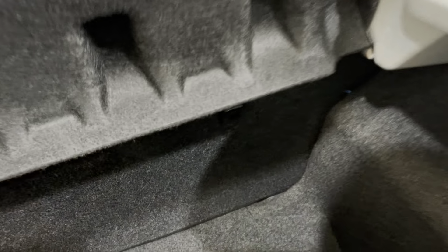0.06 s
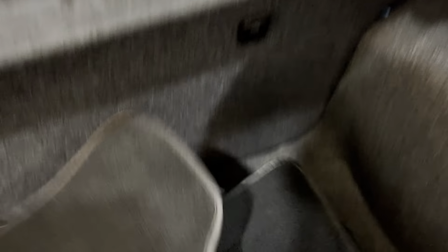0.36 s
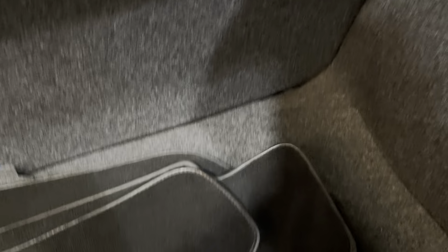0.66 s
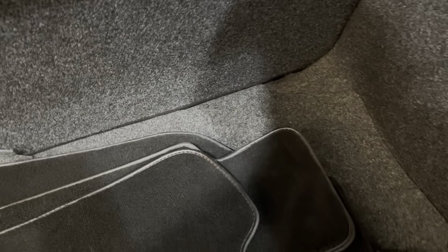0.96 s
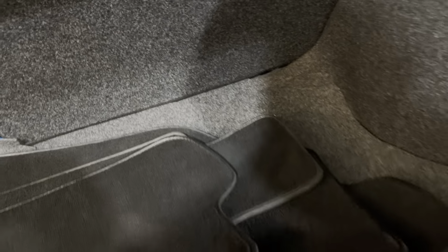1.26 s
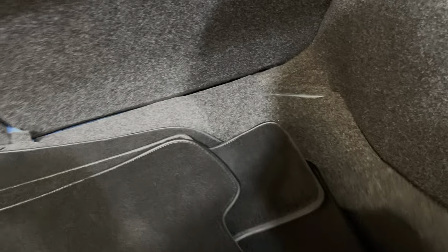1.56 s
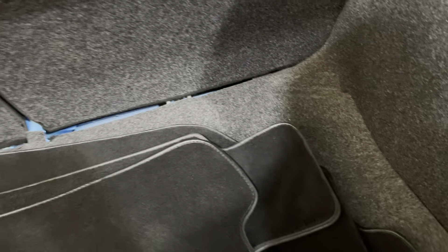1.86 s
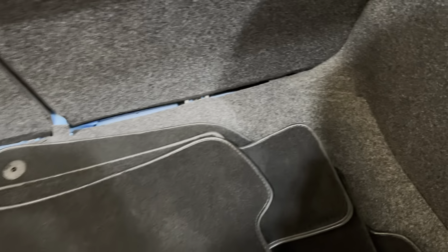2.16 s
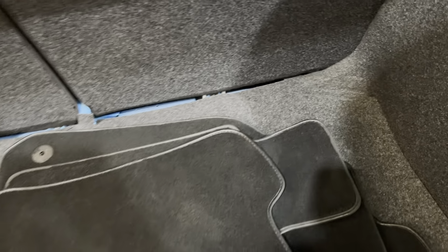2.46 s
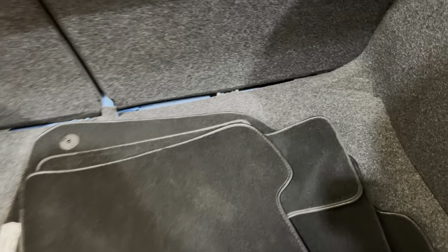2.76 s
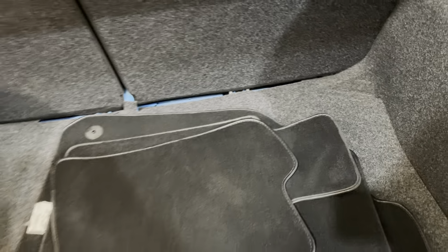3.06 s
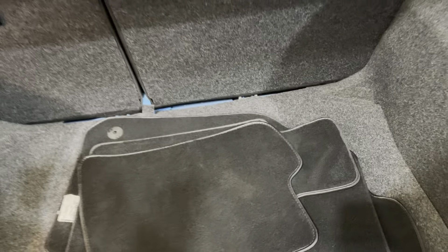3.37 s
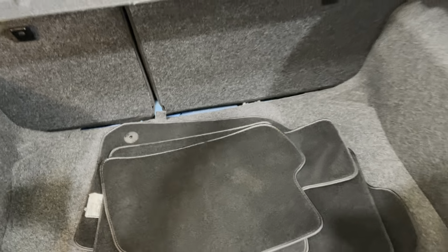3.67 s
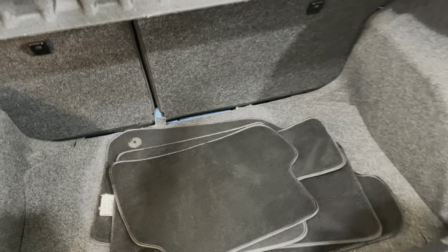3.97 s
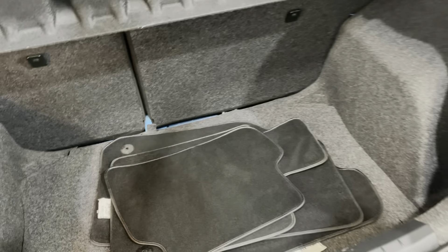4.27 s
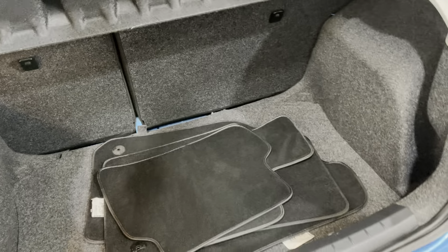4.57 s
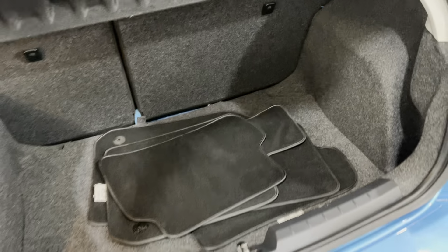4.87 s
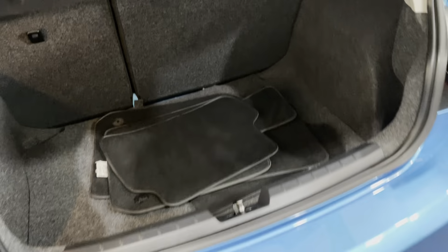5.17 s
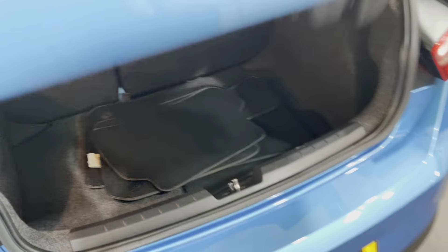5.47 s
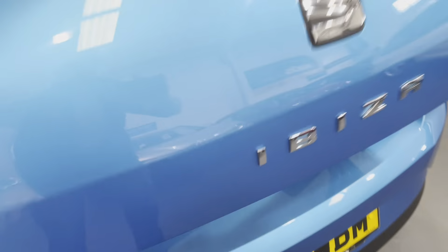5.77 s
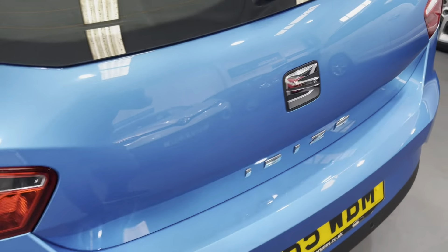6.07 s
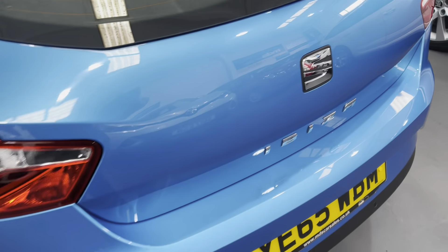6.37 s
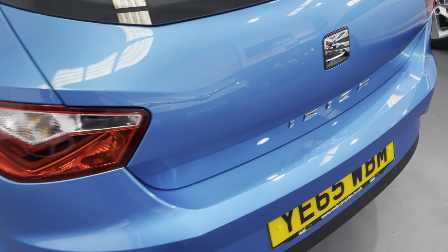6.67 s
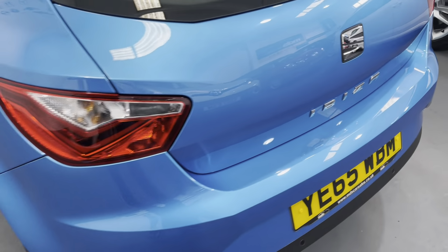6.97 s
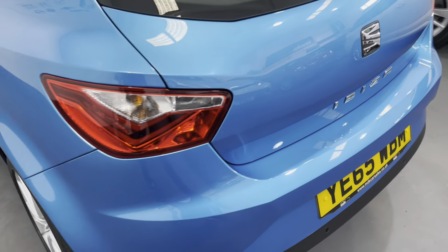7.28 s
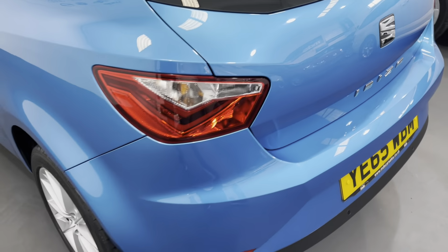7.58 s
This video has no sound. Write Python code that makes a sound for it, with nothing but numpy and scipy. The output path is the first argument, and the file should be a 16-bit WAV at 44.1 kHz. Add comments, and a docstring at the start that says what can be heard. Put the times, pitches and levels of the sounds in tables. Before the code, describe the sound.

A hand works at the carpeted shelf and plastic trim of a car boot, close to the microphone, making hollow knocks, low thumps, felt rubbing and short scrapes. A lull follows with faint sleeve swishes. The tailgate is pulled down with a soft thud and a slight hiss from its struts, then latches and slams loudly. The slam echoes through a large hall over quiet ventilation.

```python
"""At a car boot in a large ventilated hall, the carpeted shelf and trim are handled close by.
Knocks and soft pushes excite their modes; stick-slip friction makes felt hiss and plastic scrape.
Sleeves swish, the tailgate is pulled down on its gas struts, catches its latch and slams.
The hall reverberates, swelling as a limiter lets go."""
import sys
import numpy as np
from scipy import signal
from scipy.fft import rfft, irfft, next_fast_len
from scipy.io import wavfile
from scipy.ndimage import uniform_filter1d, minimum_filter1d

SR = 44100
rng = np.random.default_rng(int(sys.argv[2]) if len(sys.argv) > 2 else 0)


def generate_wav(sig):
    """Save sig (samples, or channels by samples) to the path in sys.argv[1] as 16-bit PCM at SR."""
    pcm = np.round(np.clip(np.atleast_2d(sig).T, -1, 1) * 32767).astype(np.int16)
    wavfile.write(sys.argv[1], SR, pcm)


N = 344579
TIME = np.arange(N) / SR


def amp(db):
    """Amplitude ratio of a level in decibels."""
    return 10 ** (np.asarray(db) / 20)


def unit(x):
    """Normalisation to rms 1."""
    return x / np.sqrt(np.mean(x ** 2) + 1e-20)


def read(points, hz, axis=1):
    """Interpolation of one table column over log frequency."""
    table = np.array(points, float)
    return np.interp(np.log(hz + 1), np.log(table[:, 0] + 1), table[:, axis])


def add(mix, s, sound):
    """Superposition: a sound joins the mix at time s."""
    part = mix[..., max(round(s * SR), 0):][..., :sound.shape[-1]]
    part += sound[..., :part.shape[-1]]


def tint(x, spectrum):
    """Zero-phase filtering by a curve of (frequency [Hz], gain [dB])."""
    size = next_fast_len(x.shape[-1])
    gain = amp(read(spectrum, np.fft.rfftfreq(size, 1 / SR)))
    return irfft(rfft(x, size) * gain, size)[..., :x.shape[-1]]


def octaves(x):
    """Filter bank of overlapping octaves, giving (centre [Hz], band) pairs."""
    size = next_fast_len(x.shape[-1])
    hz, spectrum = np.fft.rfftfreq(size, 1 / SR), rfft(x, size)
    centres = 50 * 2. ** np.arange(9)
    shares = [np.interp(np.log(hz + 1), np.log(centres), row) for row in np.eye(len(centres))]
    return [(c, irfft(spectrum * share, size)[..., :x.shape[-1]]) for c, share in zip(centres, shares)]


def lag(x, time_s):
    """First-order relaxation towards x with time constant time_s."""
    pole = np.exp(-1 / (time_s * SR))
    return signal.lfilter([1 - pole], [1, -pole], x)


def decay(t, t60):
    """Exponential damping: 60 dB lost every t60 seconds."""
    return np.exp(-np.log(1000) * t / t60)


def between(start, end, edge_s):
    """Trapezoidal gate from start to end."""
    return np.clip(np.minimum(TIME - start, end - TIME) / edge_s, 0, 1)


def swells(rows, depth_db, edge_s=0.0054):
    """Level follows speed: a movement gains depth_db up to its fastest moment, then loses it."""
    out = np.zeros(N)
    for start, fastest, end, db in rows:
        slowness = np.interp(TIME, [start, fastest, end], [1, 0, 1])
        out += amp(db - depth_db * slowness) * between(start, end, edge_s)
    return out


def strokes(rows, attack):
    """Envelopes of short strokes: a linear rise over the fraction attack, then a smooth fall."""
    out = np.zeros(N)
    for s, length, db in rows:
        done = np.linspace(0, 1, int(length * SR))
        add(out, s, amp(db) * np.minimum(done / attack, 1) * np.cos(np.pi / 2 * done ** 2) ** 2)
    return out


# the field at two microphone ports: (frequency [Hz], coherence [0-1], phase lead of the left [rad])
PORT_COHERENCE = [(60.1, 0.97, 0), (278, 0.85, 0), (585, 0.28, 0.5), (1200, 0.22, 0.66), (2860, 0.59, .5),
                  (7700, 0.87, 1), (8920, 0.6, -0.5), (10830, 1, -5.5), (11360, 0.5, -5.5),
                  (13000, 0.7, -2.5)]
def ports(x, spectrum):
    """Partial coherence: two independent signals become one coloured sound at two nearby points."""
    size = next_fast_len(x.shape[-1])
    hz = np.fft.rfftfreq(size, 1 / SR)
    left, independent = rfft(x, size)
    coherence = np.clip(read(PORT_COHERENCE, hz), 0, 1)
    phase = read(PORT_COHERENCE, hz, axis=2)
    right = (coherence * left + np.sqrt(1 - coherence ** 2) * independent) * np.exp(-1j * phase)
    return irfft(np.array([left, right]) * amp(read(spectrum, hz)), size)[:, :x.shape[-1]]


def noise(spectrum, size=N):
    """Coloured Gaussian noise at both ports."""
    return unit(ports(rng.standard_normal((2, size)), spectrum))


def friction(spectrum, slips_per_s, spread_db, clump_db):
    """Stick-slip friction: random impulses whose strength varies in clumps of a few milliseconds."""
    clumps = unit(tint(rng.standard_normal(N), [(40, 0), (150, -12), (500, -60)]))
    slips = rng.random(N) < slips_per_s / SR
    strength = amp(spread_db * np.minimum(rng.exponential(1, N), 4) + clump_db * clumps)
    return unit(ports(slips * strength * rng.standard_normal((2, N)), spectrum))


def blows(rows, modes, fine_spectrum, fine_decay, modes_db, rise_s, size=12000):
    """Modal impact response: a few main modes, plus dense fine ones as decaying bands of noise."""
    out = np.zeros((2, N))
    t, hz = np.arange(size) / SR, np.fft.rfftfreq(size, 1 / SR)
    for s, db, tilt_db, ring in rows:
        tilt = lambda f: amp(tilt_db * np.log2(np.maximum(f, 500) / 1000))  # harder is brighter
        burst = irfft(rfft(noise(fine_spectrum, size)) * tilt(hz), size)
        fine = sum(band * decay(t, read(fine_decay, f) * ring) for f, band in octaves(burst))
        main = np.zeros(size)
        for f, mode_db, t60 in modes:
            sign = rng.choice([-1, 1])  # set by the spot that is struck
            main += sign * amp(mode_db) * tilt(f) * np.sin(2 * np.pi * f * t) * decay(t, t60 * ring)
        add(out, s, amp(db) * (fine + amp(modes_db) * main) * (1 - np.exp(-t / rise_s)))
    return out


def flex(rows, rise_cycles, overtone, overtone_db, size=24000):
    """Damped free vibration: a fundamental and one weaker, faster-fading mode above it."""
    out, t = np.zeros(N), np.arange(size) / SR
    for s, db, hz, t60 in rows:
        fade = decay(t, t60)
        fundamental = fade * np.sin(2 * np.pi * hz * t)
        upper = amp(overtone_db) * fade ** 1.53 * np.sin(2 * np.pi * hz * overtone * t)
        onset = 1 - np.exp(-(t * hz / rise_cycles) ** 2)
        add(out, s, amp(db) * (fundamental + upper) * onset)
    return out


# air moving in the hall: (frequency [Hz], spectral density [dB])
VENT_SPECTRUM = [(15, -24), (25, -16.5), (59, -8.5), (144, -22), (178, -17.5), (360, -26), (520, -27),
                 (577, -25.5), (624, -28), (1230, -27), (1520, -33), (1730, -31.5), (2920, -42.5),
                 (3420, -45), (13000, -71), (16900, -85.5), (22000, -120)]
def ventilation(start_db=-53.5, rise_db_per_s=0.94, step_back_s=3.4):
    """Broadband flow noise, growing louder on stepping back from the boot."""
    return amp(start_db + rise_db_per_s * np.maximum(TIME - step_back_s, 0)) * noise(VENT_SPECTRUM)


# hard blows: (time [s], level [dB], treble tilt [dB/octave], t60 factor [1], rebound gain [dB])
SHELF_KNOCKS = [(.031, -51.5, 3, 0.83, -15), (.417, -31.5, -3, 1.56, 12), (.440, -10, -6.5, 0.74, 2.5),
                (.663, -31.5, 6, 0.42, 4.5), (.697, -32, -8, 2.74, -15), (.771, -34.5, -4, 0.5, -15),
                (.834, -47.5, 9.5, 0.73, -21.5), (0.915, -34, -0.5, 1.36, -19.5),
                (0.9322, -13, -1, .56, -27), (1.019, -41.5, 3.5, 0.81, -18), (1.061, -48.5, 8.5, 0.35, 1.5),
                (1.158, -32, 4, 0.92, -19), (1.702, -49, -4.5, .9, -13), (1.7681, -16, -5, 1.02, -27),
                (1.886, -35, -6.5, 2, -7), (1.995, -50, 6, 0.9, -3), (2.034, -49, 3.5, 1.5, -1),
                (2.0872, -37, 0.5, 0.66, -31), (4.483, -42, 3, 2, -1), (4.549, -47.5, -1.5, 6.3, -7)]
# main modes of the shelf: (frequency [Hz], level [dB], t60 [s])
SHELF_MODES = [(468, -11, 0.24), (533, 3.5, 0.067), (656, 4, .07), (708, 3.5, 0.085), (908, 6.5, 0.047),
               (910, -10, 0.057), (1420, -10, 0.036), (1456, -2, 0.057), (2004, -36, 0.056),
               (2600, -13.5, 0.034)]
# fine modes of the trim: (frequency [Hz], spectral density [dB]) and (frequency [Hz], t60 [s])
TRIM_SPECTRUM = [(35, -17.5), (100, 3.5), (150, 3.5), (370, -5.5), (520, -2.5), (700, -8.5), (1350, -4),
                 (2400, -11), (3500, -16), (5500, -20), (8500, -23.5), (12000, -26.5)]
TRIM_T60 = [(200, 0.16), (700, 0.062), (2000, 0.063), (10000, 0.04)]
def knocks(rebound_s=0.012):
    """Impact and rebound: each blow rings shelf and trim, and a loose part strikes once more."""
    first = [row[:4] for row in SHELF_KNOCKS]
    second = [(s + rebound_s, db + gain_db, tilt, ring) for s, db, tilt, ring, gain_db in SHELF_KNOCKS]
    return blows(first + second, SHELF_MODES, TRIM_SPECTRUM, TRIM_T60, modes_db=-15.5, rise_s=0.00027)


# hand over felt: (start [s], fastest [s], end [s], relative hiss level [dB], scrape level [dB])
HAND_RUBS = [(0.067, 0.105, 0.2, -46, -59.5), (0.17, 0.378, 0.407, -41.5, -55.5),
             (0.415, 0.421, 0.57, -38, -44), (0.657, 0.664, 0.86, -49, -44), (0.807, 0.831, 0.99, -36, -44),
             (0.936, 1.079, 1.097, -45.5, -48.5), (1.085, 1.158, 1.2, -36, -47),
             (1.345, 1.515, 1.54, -45, -53), (1.52, 1.598, 1.78, -48.5, -54.5),
             (1.682, 1.837, 1.933, -40.5, -40), (1.88, 1.918, 2.09, -49, -51)]
# fibre hiss, board scrape and board rumble: (frequency [Hz], spectral density [dB])
FELT_SPECTRUM = [(700, -37), (2000, -3), (4000, 0.5), (6500, 0.5), (9000, 2.5), (11400, 4), (12800, 5.5)]
BOARD_SPECTRUM = [(130, -7.5), (300, -10.5), (700, 3), (1100, -3.5), (2000, -7.5), (3200, -12.5),
                  (6000, -19), (12000, -34)]
RUMBLE_SPECTRUM = [(25, -49), (60, 7.5), (115, -6), (220, -8), (400, -23), (900, -54)]
def rubbing():
    """Sliding friction: felt fibres hiss, and their slips force the board into vibration."""
    creep = between(0.032, 2.11, edge_s=0.046)  # the hand stays on the shelf between strokes
    hiss = swells([(*times, db) for *times, db, _ in HAND_RUBS], depth_db=20.5) + amp(-66) * creep
    scrape = swells([(*times, db) for *times, _, db in HAND_RUBS], depth_db=20.5) + amp(-65.5) * creep
    fibres = amp(1.0) * hiss * friction(FELT_SPECTRUM, slips_per_s=11000, spread_db=0.0, clump_db=3)
    board = scrape * friction(BOARD_SPECTRUM, slips_per_s=3100, spread_db=0.5, clump_db=3.5)
    rumble = amp(-10.5) * lag(scrape ** 0.62 + 1e-12, time_s=0.015)  # 0.62 dB per dB of scrape
    return fibres + board + rumble * noise(RUMBLE_SPECTRUM)


# plastic dragging over plastic: (time [s], duration [s], level [dB])
PLASTIC_DRAGS = [(.071, 0.082, -32.5), (.83, 0.11, -42.5), (1.125, 0.069, -39), (1.43, 0.18, -42),
                 (1.815, 0.057, -44)]
# a single slip: (frequency [Hz], spectral density [dB])
SLIP_SPECTRUM = [(100, 7), (3000, -4), (4200, -4.5), (7000, -10.5), (9000, -4.5), (12000, 1)]
# resonances of the hollow trim: (frequency [Hz], bandwidth [Hz], level [dB])
HOLLOW_MODES = [(297, 35, 1), (465, 14, 0), (593, 190, -2.5), (705, 20, -1), (760, 7.6, -6), (980, 140, -2),
                (1490, 87, -4.5), (1780, 160, -6.5), (2270, 190, -6.5), (2640, 330, -12), (7900, 1100, -33)]
def scrapes():
    """Source and filter: dense stick-slip impulses drive the resonances of the hollow trim."""
    slips = friction(SLIP_SPECTRUM, slips_per_s=4200, spread_db=3.5, clump_db=0.0)
    slips *= strokes(PLASTIC_DRAGS, attack=0.11)
    rung = sum(amp(db) * signal.lfilter(*signal.iirpeak(hz, hz / width, SR), slips + 1e-12)
               for hz, width, db in HOLLOW_MODES)
    return unit(rung) * np.std(slips)


# soft pushes on the board: (time [s], relative level [dB], contact time [s])
BOARD_PUSHES = [(.315, -34, 0.0044), (.432, -5, .0029), (0.4413, -3, .0058), (0.471, -17.5, 0.0033),
                (0.514, -23.5, 0.0075), (0.583, -28.5, 0.0057), (.704, -26.5, .003), (0.849, -28, 0.0038),
                (0.9379, -23, .0036), (1.064, -31.5, 0.0091), (1.15, -34.5, 0.0055), (1.452, -29.5, 0.0063),
                (1.495, -28, 0.0097), (1.772, -7.5, 0.0026), (1.783, -15, 0.0072), (1.899, -17.5, 0.0042),
                (1.931, -13.5, 0.0034), (2.012, -27, 0.0078), (2.099, -30.5, 0.0055)]
# its bending modes: (frequency [Hz], level [dB], t60 of a -27.5 dB push [s])
BENDING_MODES = [(61.2, -4.5, 0.32), (87.6, 4, .14), (112.4, 3.5, .17), (145.7, -3, 0.16), (195.3, 1, 0.1),
                 (230, 1, 0.062), (295.4, -11.5, 0.17)]
def thumps(octave_off_loss_db=14.5, free_db=-27.5, db_per_halving=28.5):
    """Pulse excitation: a push favours the mode whose half period equals its contact time."""
    swings = []
    for s, db, contact_s in BOARD_PUSHES:
        ring = .5 ** ((db - free_db) / db_per_halving)  # pressed harder, the lining damps the board
        for hz, mode_db, t60 in BENDING_MODES:
            loss_db = octave_off_loss_db * np.log2(2 * contact_s * hz) ** 2
            swings.append((s, db + mode_db - loss_db, hz, t60 * ring))
    return amp(2.5) * flex(swings, rise_cycles=0.57, overtone=2.3, overtone_db=-21.5)


# single parts of trim and hinges: (time [s], level [dB], frequency [Hz], t60 [s])
PART_PINGS = [(.664, -22.5, 718, 0.082), (1.7685, -16, 2130, 0.014), (4.801, -54.5, 2550, 0.055),
              (4.802, -50, 3550, 0.029), (5.614, -47, 1910, .06), (5.617, -47, 2430, 0.054),
              (5.62, -49, 3270, 0.058)]
def pings():
    """Free vibration: small parts under load ring briefly, each with an inharmonic overtone."""
    return flex(PART_PINGS, rise_cycles=1.8, overtone=1.47, overtone_db=-16)


# sleeves and soles: (time [s], duration [s], relative level [dB])
CLOTH_STROKES = [(2.43, 0.54, -61), (2.76, 0.33, -67), (3.45, 0.15, -63), (4.21, 0.1, -61.5),
                 (4.54, 0.05, -60), (4.67, 0.04, -48.5), (5.5, 0.13, -62), (5.91, 0.056, -58.5),
                 (7.11, 0.13, -61), (7.26, 0.16, -61), (7.53, 0.07, -63.5)]
# sliding fabric: (frequency [Hz], spectral density [dB])
CLOTH_SPECTRUM = [(500, -8), (1500, -2), (3000, -1), (6000, 0.5), (9000, 0.5), (12000, 0.5)]
def clothes():
    """Amplitude-modulated friction noise: folds of cloth swish unevenly on stepping back."""
    folds = amp(1.5 * unit(tint(rng.standard_normal(N), [(15, 0), (60, -12), (200, -60)])))
    return amp(-0.5) * strokes(CLOTH_STROKES, attack=0.32) * folds * noise(CLOTH_SPECTRUM)


# movements of the panel and the struts: (start [s], fastest [s], end [s], level [dB])
PANEL_PULLS = [(3.6, 4.05, 4.7, -53.5), (4.35, 4.58, 5.22, -51.5), (5.1, 5.75, 7.2, -47.5)]
STRUT_STROKES = [(4.52, 4.7, 6.2, -61)]
# panel drone and gas hiss: (frequency [Hz], spectral density [dB])
DRONE_SPECTRUM = [(90, -12.5), (200, -6.5), (268, 2), (330, -12.5), (550, -11.5), (1000, -17), (3000, -46)]
GAS_SPECTRUM = [(3000, 1), (7500, -10), (9300, -0.5), (11300, 2), (13000, -5.5)]
# the panel flexing at each tug: (time [s], level [dB], frequency [Hz], t60 [s])
PANEL_TUGS = [(4.305, -31.5, 187.6, 0.14), (4.33, -35, 122, 0.31), (4.56, -41, 138, 0.25)]
def tailgate_swing():
    """Flow noise and forced vibration: gas hisses through the struts as the tugged panel drones."""
    hiss = swells(STRUT_STROKES, depth_db=17, edge_s=.06) * noise(GAS_SPECTRUM)
    drone = swells(PANEL_PULLS, depth_db=13.5, edge_s=.08) * noise(DRONE_SPECTRUM)
    return hiss + drone + flex(PANEL_TUGS, rise_cycles=0.33, overtone=1.83, overtone_db=-10.5)


# clicks of steel fittings: (time [s], level [dB], treble tilt [dB/octave], t60 factor [1])
LATCH_CLICKS = [(4.18, -53, 1, 0.46), (4.801, -48, -1, 0.6), (5.614, -51.5, -2.5, 4.2),
                (6.012, -16.5, -0.5, 0.34), (6.0445, -11.5, -4, 2.5), (6.06, -15.5, 2.5, 1.4)]
# their main modes: (frequency [Hz], level [dB], t60 [s])
LATCH_MODES = [(528, -2.5, 0.13), (756, -3.5, 0.067), (1110, -10, 0.04), (1210, -1, 0.066),
               (1490, 2.5, 0.044), (2000, -3.5, 0.038), (2480, -8.5, 0.052), (2400, -10, 0.049),
               (2970, -2.5, 0.049), (3565, -8, 0.035), (4170, -13, 0.052), (4880, -2, 0.018),
               (6300, -4, 0.013)]
# their fine modes: (frequency [Hz], spectral density [dB]) and (frequency [Hz], t60 [s])
LATCH_SPECTRUM = [(300, -9.5), (1200, 3.5), (2300, -3), (6000, -6.5), (9000, -16.5), (12000, -13)]
LATCH_T60 = [(500, 0.051), (10000, 0.042)]
def latch():
    """Brief contact excites high modes: fittings click as the tailgate moves and the latch closes."""
    return blows(LATCH_CLICKS, LATCH_MODES, LATCH_SPECTRUM, LATCH_T60, modes_db=-4.5, rise_s=0.00054)


# latch, striker, frame and seal meet: (time [s], level [dB], treble tilt [dB/octave], t60 factor [1])
SLAM_CONTACTS = [(6.016, -30.5, -3, 2.1), (6.047, -8, 2.5, 0.52), (6.059, -8, 1, 1.7),
                 (6.0655, 1.5, 0, 1.13), (6.075, -1.5, -2, 1.13)]
# main modes of the tailgate's steel skin: (frequency [Hz], level [dB], t60 [s])
SKIN_MODES = [(204, -2, 0.052), (298, 1, 0.058), (384, -8, 0.094), (415, -1.5, 0.19), (492, -5.5, .11),
              (576, -14.5, 0.26), (711, -5, 0.14), (785, -4.5, 0.13), (922, -2.5, .12), (1156, -4.5, 0.066),
              (1394, -15, 0.12), (1483, 0.5, 0.055), (2010, -7, 0.1), (2290, -9.5, 0.064)]
# its fine modes: (frequency [Hz], spectral density [dB]) and (frequency [Hz], t60 [s])
SKIN_SPECTRUM = [(60, -3.5), (200, 6), (500, -0.5), (900, -3), (1600, -8.5), (2500, -12), (4500, -20.5),
                 (8000, -23.5), (12000, -24)]
SKIN_T60 = [(150, 0.061), (700, 0.068), (2500, 0.097), (10000, 0.071)]
# car body and trapped cabin air: (time [s], level [dB], frequency [Hz], t60 [s])
BODY_BOOMS = [(6.026, -20.5, 95, 0.11), (6.0465, 2, 467, 0.046), (6.055, -5, 182.8, 0.07),
              (6.074, 7, 57.2, 0.15), (6.076, 2, 223, 0.071), (6.08, -13.5, 35.6, 0.16)]
def slam():
    """Impact on a plate: the steel skin clashes while low modes of body and cabin air boom."""
    skin = blows(SLAM_CONTACTS, SKIN_MODES, SKIN_SPECTRUM, SKIN_T60, modes_db=-9, rise_s=0.0016)
    return skin + flex(BODY_BOOMS, rise_cycles=0.26, overtone=1.75, overtone_db=-3.5)


# reverberation of the hall: (frequency [Hz], gain [dB], t60 [s])
HALL_BANDS = [(52.3, -10, 1.55), (103, -8.5, 1.47), (200, -15.5, 1.3), (400, -14, 1.58), (830, -14, 2.11),
              (1623, -15.5, 2.1), (3200, -16.5, 1.62), (6070, -17, 1.11), (12730, -19, 0.37)]
def hall(x, build_s):
    """Diffuse field: each octave fills with the sound's energy, then loses it exponentially."""
    out = np.zeros((2, N))
    for (hz, band), (_, field) in zip(octaves(x[0]), octaves(noise(SKIN_SPECTRUM))):
        leak_s = read(HALL_BANDS, hz, axis=2) / np.log(10 ** 6)  # t60 to energy time constant
        energy = lag(lag(band ** 2 + 1e-16, build_s), leak_s)
        out += amp(read(HALL_BANDS, hz)) * np.sqrt(energy) * unit(field)
    return out


# stereo balance: (frequency [Hz], left minus right level [dB])
BALANCE = [(60, 1.6), (200, 1.3), (600, .6), (1200, .9), (3500, 3), (8000, .3), (12000, 0)]
def scene():
    """Direct and reverberant sound add: the lined boot muffles what reaches the hall from inside."""
    inside = knocks() + thumps() + rubbing() + scrapes()
    outside = latch() + slam()
    reverberation = hall(outside + amp(-9.5) * inside, build_s=0.0092)
    mix = inside + outside + reverberation + ventilation() + clothes() + tailgate_swing() + pings()
    return np.array([tint(channel, [(hz, side * db / 2) for hz, db in BALANCE])
                     for channel, side in zip(mix, (1, -1))])


# microphone response: (frequency [Hz], gain [dB])
MIC_RESPONSE = [(15, -19), (30, -7.5), (50, 2), (7000, -1), (10200, 4.5), (11800, -2), (13000, -17.5),
                (14000, -27.5)]
def record(dry, ceiling_db=1.5, recover_db_per_s=42, cutoff_hz=13000):
    """Peak limiting with slow release, after the microphone and before saturation and a low-pass."""
    heard = tint(dry, MIC_RESPONSE)
    over_db = np.maximum(20 * np.log10(abs(heard).max(0) + 1e-9) - ceiling_db, 0)
    held_db = -minimum_filter1d(-over_db, size=90)  # peaks are held for 2 ms
    release_db = recover_db_per_s * TIME
    reduction_db = np.maximum.accumulate(held_db + release_db) - release_db
    ducked = heard * amp(-uniform_filter1d(reduction_db, size=90))
    saturated = ducked / (1 + (ducked / .93) ** 6) ** (1 / 6)
    lowpass = signal.firwin(201, cutoff_hz, window=("kaiser", 8), fs=SR)
    return signal.oaconvolve(saturated, lowpass[None], "same")


dry = scene()
out = record(dry)
generate_wav(out)
```